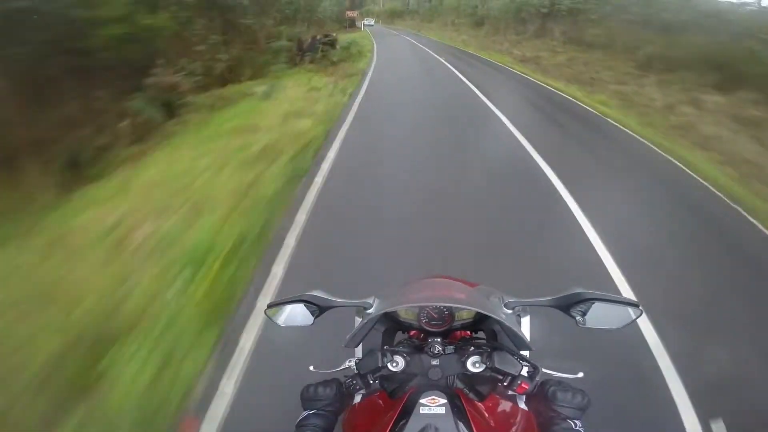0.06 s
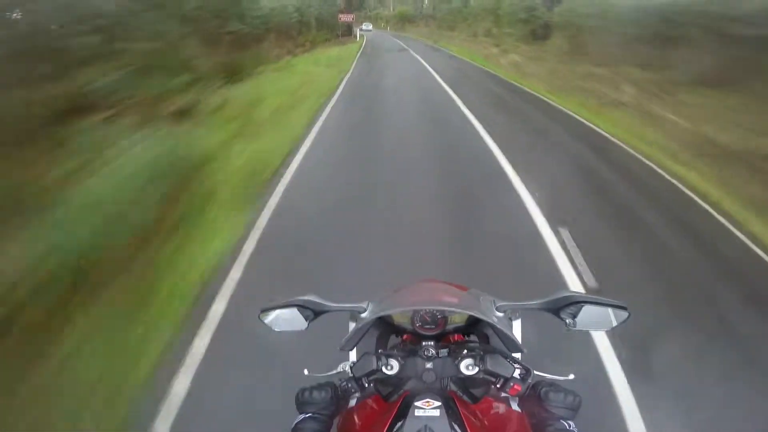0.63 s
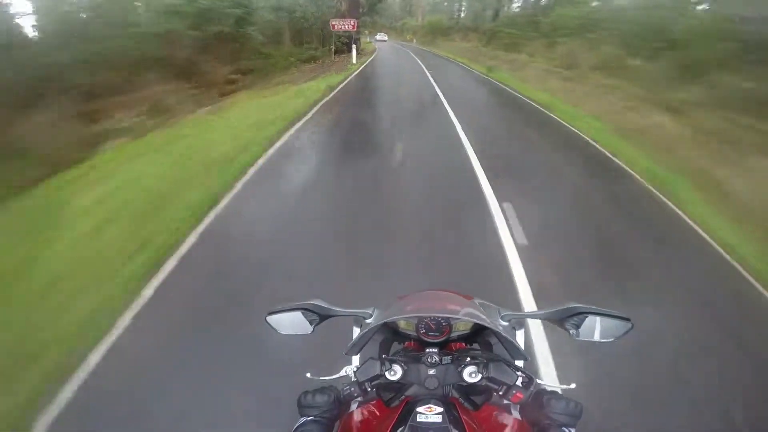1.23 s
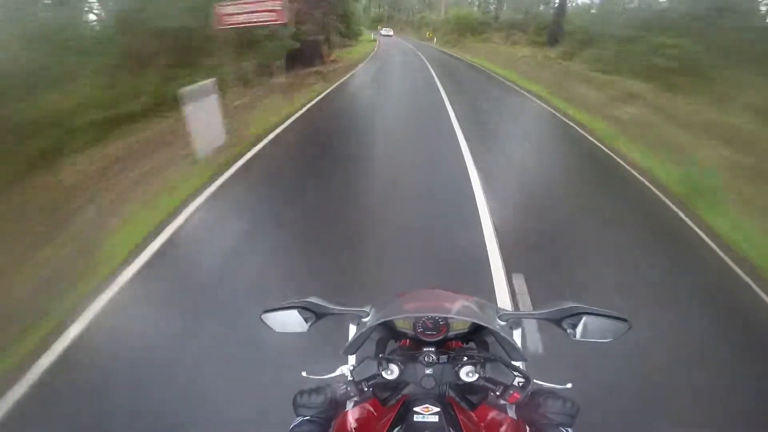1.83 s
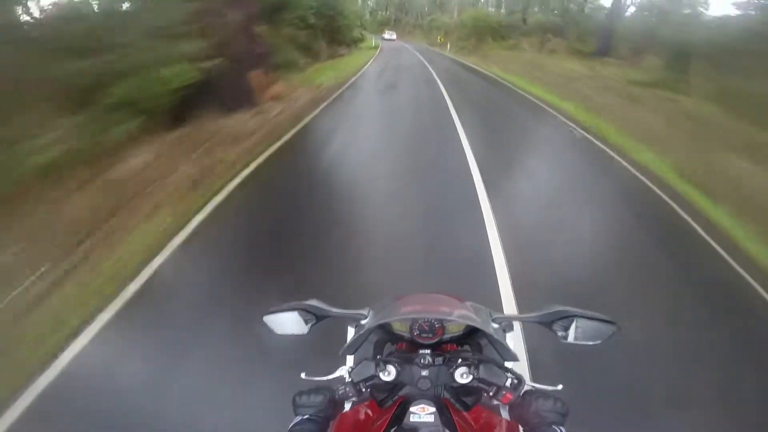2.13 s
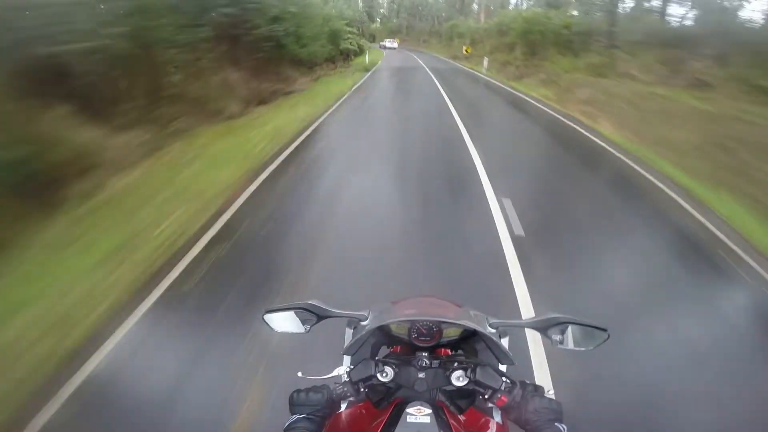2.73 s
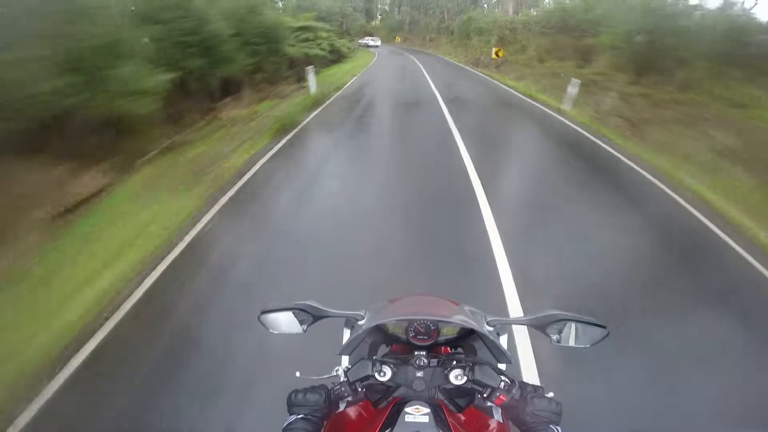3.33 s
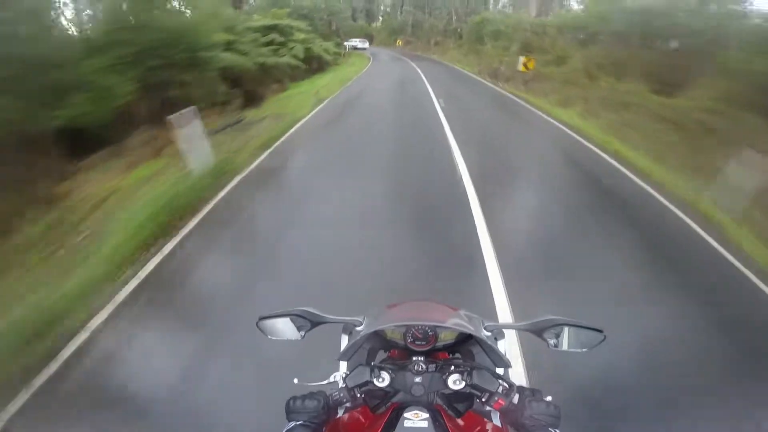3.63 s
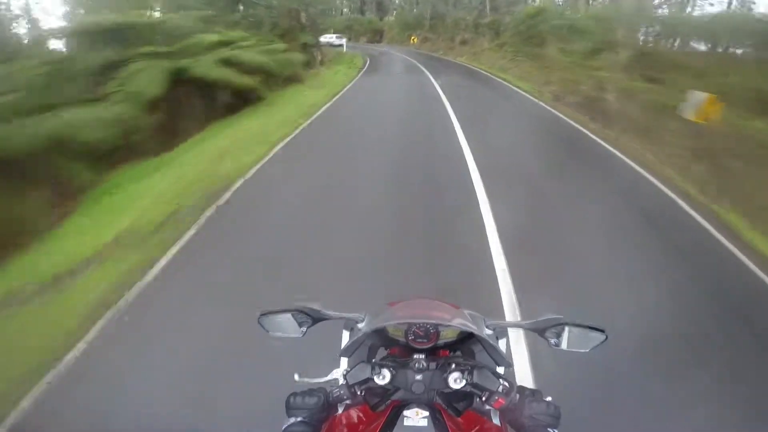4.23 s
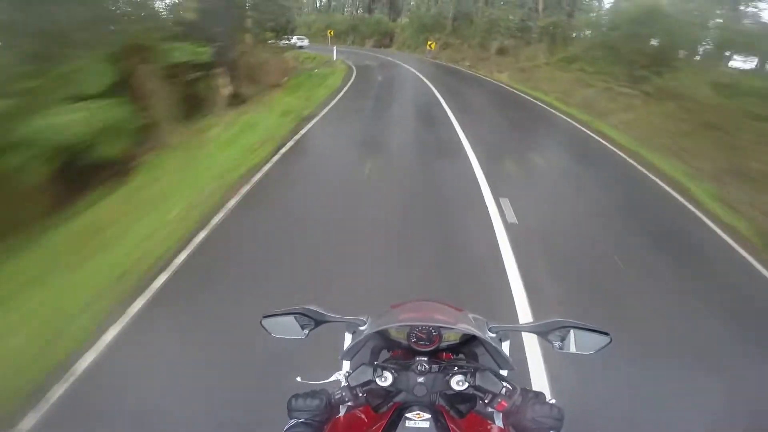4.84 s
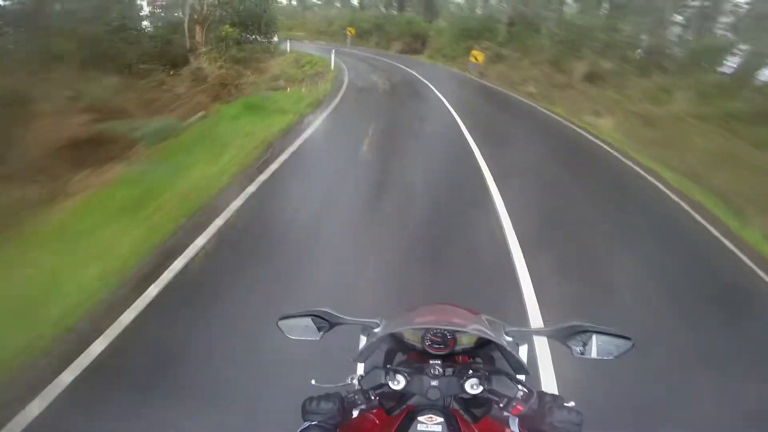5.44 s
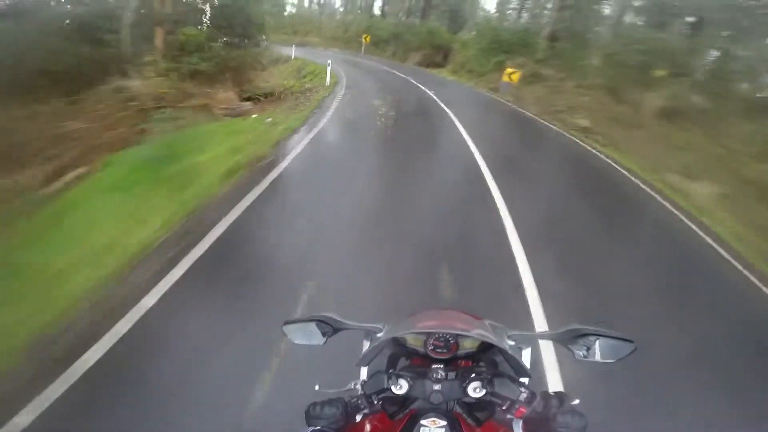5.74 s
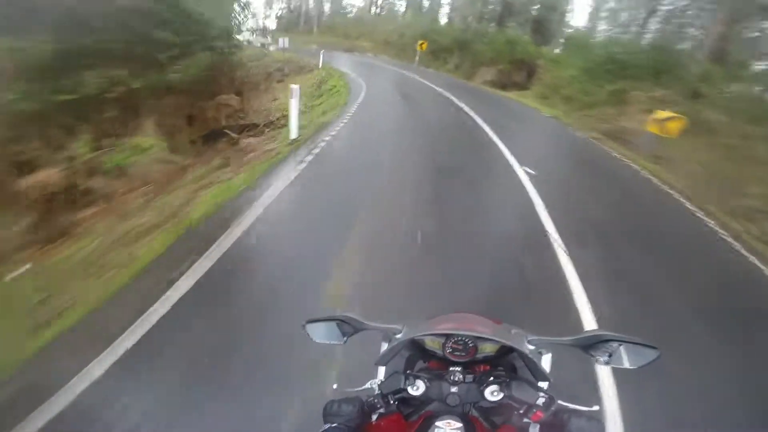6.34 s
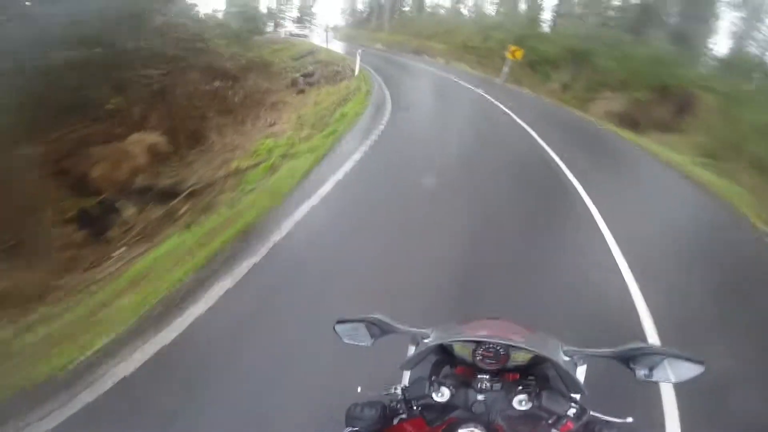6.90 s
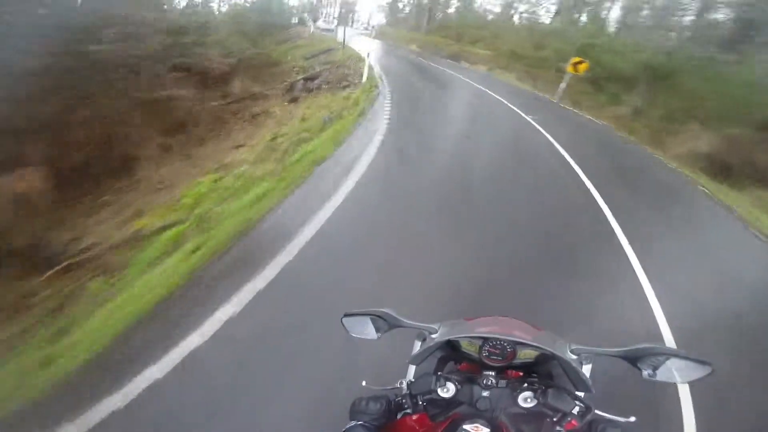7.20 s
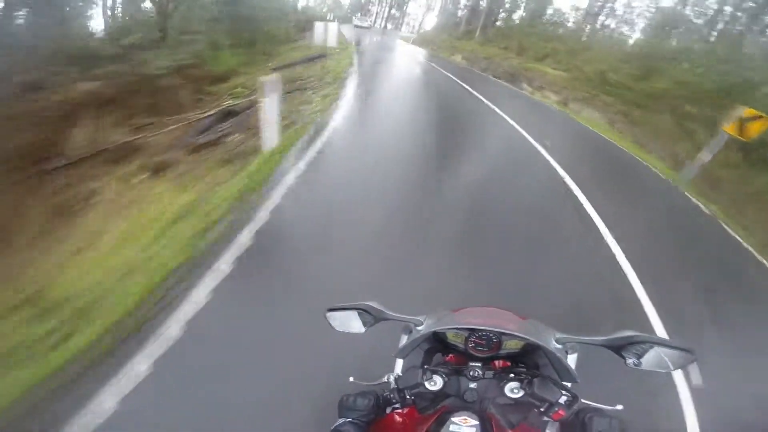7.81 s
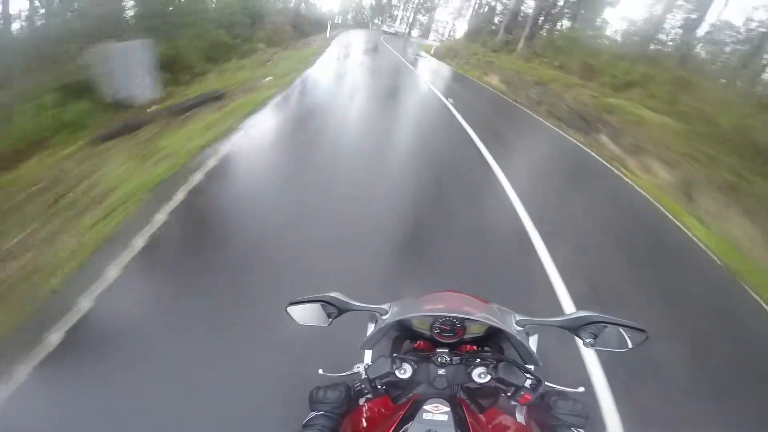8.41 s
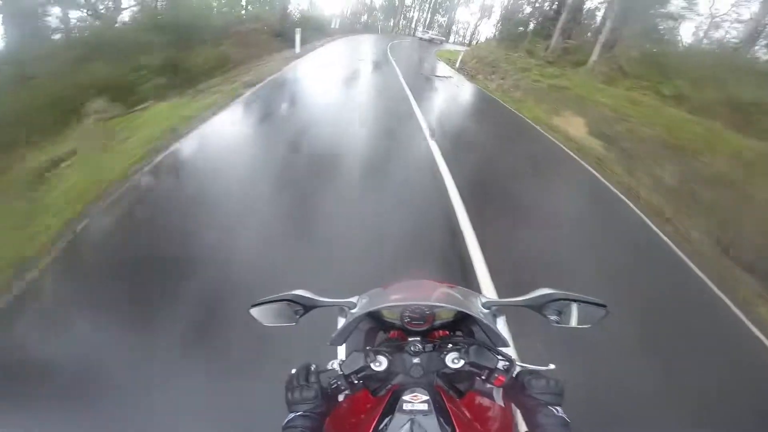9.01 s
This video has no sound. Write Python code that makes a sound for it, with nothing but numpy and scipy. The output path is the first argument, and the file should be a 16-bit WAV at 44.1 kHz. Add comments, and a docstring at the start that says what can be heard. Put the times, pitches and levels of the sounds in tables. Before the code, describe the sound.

Rushing air, surges of spray and a low wind rumble surround a steadily humming motorcycle engine, picked up by an enclosed microphone on the bike. Bumps bring soft booms and raindrops tap right by the microphone. The bike slows for a bend, its note falling and the rush softening. One hard drop clicks loudly, briefly dipping the other sound, then the engine picks up slightly at a low pitch.

```python
"""Motorcycle on a wet road

One microphone, on board, in a closed camera case. The bike cruises, rolls off for a bend and gently
picks up, all in one gear. The engine hums through the mount, which also booms with the bumps. Wind
buffets, the tyres roar, and air and spray hiss through the case, louder with speed and on wet stretches.
Drops tick on the shell, right by the microphone; the hardest makes the limiter duck for a moment."""
import sys
import numpy as np
from scipy import signal
from scipy.fft import rfft, irfft
from scipy.io import wavfile
from scipy.ndimage import minimum_filter1d

SR = 44100
rng = np.random.default_rng(int(sys.argv[2]) if len(sys.argv) > 2 else 0)


def dump(signal):
    """Clip the signal to [-1, 1] and save it as 16-bit WAV at the path in sys.argv[1]."""
    limited = np.clip(np.atleast_2d(signal).T, -1, 1)
    pcm = np.round(limited * 32767).astype(np.int16)
    wavfile.write(sys.argv[1], SR, pcm)


N = 403956
TIME = np.arange(N) / SR
FREQ = np.maximum(np.arange(N // 2 + 1) * SR / N, 1)
CRUISE_HZ, TOP_HZ = 75, 15100  # crank rate at cruise; top of the camera's band

# crank rate, which in one gear also gives road speed: t/s, f/Hz
CRANK_RATE = [(0.0, 73.2), (0.5, 75.76), (1.1, 77.24), (1.6, 77.5), (2.2, 73.57), (3.0, 69.2), (3.6, 63.8),
              (4.2, 58.66), (4.7, 53.3), (5.2, 48.43), (5.8, 43.73), (6.4, 42.76), (7.1, 40.7), (7.8, 41.3),
              (9.16, 43.18)]
# throttle: t/s, opening (0-1)
THROTTLE = [(0, 1), (1.45, 1), (1.8, 0.21), (3.5, 0.26), (6.8, 0.02), (7.3, 0.73), (8.5, 0.7), (9.1, 0.56)]
# low engine orders at cruise, ahead of the frame: crank multiple, level/dB, boost at full throttle/dB
HUM_ORDERS = [(1, -36.5, -1.5), (2, -30, 4), (3, -33, 9), (4, -29, 5.5)]
# path through the frame to the microphone: f/Hz, gain/dB
FRAME_RESPONSE = [(41, 6), (51, -3), (69, 5.5), (78, 0), (88, 2), (106, 2.5), (124, -1.5), (136, -6),
                  (155, -15.5), (175, -19.5), (225, -23), (255, -14), (280, -22.5), (305, -21.5)]
# exhaust pipe: f/Hz, gain/dB
PIPE_RESPONSE = [(200, 4), (250, -17), (300, 3.5), (345, 5.5), (385, -3), (420, -6), (470, -25), (720, -11),
                 (820, -11), (1100, -31)]
# resonances of the valve gear and its covers: f/Hz, width/Hz, gain/dB
VALVE_MODES = [(1496, 380, 8), (2800, 140, 4.5), (3530, 460, -3.5), (4540, 760, -1), (5860, 630, -59)]
# bumps that jolt the mount: t/s, boost of the boom/dB
BUMPS = [(.28, 4), (.45, 4), (.65, 6), (.9, 7), (1.06, 5), (1.15, 10.5), (1.25, 10), (2.0, 6.5), (2.14, 11),
         (2.27, 7), (2.39, 10.5), (2.82, 9.5), (3.0, 9.5), (3.12, 7), (3.61, 5.5), (3.79, 12.5),
         (3.95, 7.5), (4.2, 6), (4.56, 4), (5.0, 8.5), (5.11, 9), (6.27, 9), (6.65, 10.5), (7.2, 8),
         (7.46, 2), (8.28, 7), (8.41, 8), (8.52, 6), (8.64, 10), (8.81, 12)]
# headwind on top of the riding speed: t/s, boost of the air rush/dB
HEADWIND = [(0, -4), (.5, -1.5), (1.1, 2), (1.6, -1.5), (2.4, .5), (5.3, 0.46), (5.5, -1), (6.05, -2),
            (6.45, 2.5), (6.9, -0.1), (8.35, 2), (9.15, -0.5)]
# wind buffeting on the case: f/Hz, relative level/dB
BUFFET_SPECTRUM = [(8, -9), (20, -8.5), (26, -3), (31, -5.5), (38, -6), (60, -14), (110, -8), (200, -26)]
# gusts: start t/s, length/s, boost of the buffeting/dB
GUSTS = [(1.12, 0.27, 3), (1.58, .28, 8), (2.35, 1.6, 3.5), (4.77, 0.072, 6.5), (5.348, 0.072, 6),
         (5.86, .1, 4), (7.1, 0.38, 2.5), (8.771, 0.27, 7)]
# resonances of the case around the microphone: f/Hz, width/Hz, gain/dB
CASE_MODES = [(476.4, 20, -3), (702, 75, -5), (1005, 450, -8.5), (1578, 443, 1.65), (1790, 120, -0.5),
              (1972, 390, 0.4), (2344, 510, -0.84), (2730, 67, 1.5), (2860, 250, -2.5), (3106, 310, -1.9),
              (3510, 110, -4.5), (3696.0, 332, -5.5), (4444, 1370, -20), (5685, 440, -13),
              (6120, 320, -11.5), (6470, 420, -14.5), (7170, 1570, -26), (8950, 2800, -30.5),
              (10520, 1950, -31.5), (12464.0, 1700, -38)]
# wetter road: start t/s, length/s, boost of coarse spray/dB, of fine spray/dB, of mist/dB
WET_STRETCHES = [(.31, 0.034, 4.5, 6.6, 1), (.45, 0.095, 3.5, 7.6, 1), (.63, .03, 1.5, 5.4, 4),
                 (.8, 0.55, 2.5, 5.7, 3.5), (1.486, 0.037, 3, 3, 2.2), (1.697, 0.11, 3, 3.3, 2.2),
                 (2.23, 0.45, 2.5, 3.2, 2.5), (2.844, 0.78, 3, 2.4, 2.7), (3.81, .04, 6.5, 5.6, 3),
                 (3.992, 0.054, 5.5, 4.2, 3.4), (4.44, 0.085, 4.5, 3, 2.2), (4.788, .52, 5, 3.3, 3.4),
                 (5.773, 0.046, 8, 6, 3), (6.26, 0.15, 7, 5, 2.7), (6.498, 0.11, 5, 2.7, 2.7),
                 (7.995, .55, 4.5, 3, 6), (8.7, 0.44, 2.5, 1.9, 3.1)]
# road roar from the tyres below: f/Hz, relative level/dB
ROAD_SPECTRUM = [(40, -24), (90, -8), (165, 6.5), (200, 3), (260, 0), (400, -3), (600, -4.5), (820, -11),
                 (1300, -10.5), (3000, -44)]
# tones of the electronics: f/Hz, level/dB
WHINE_TONES = [(11719, -94), (14625, -80)]
# drops on the case: t/s, peak level/dB, brightness/(dB per octave), ring time factor, struck spot f/Hz
DROPS = [(0.324, -14, -1, .6, 7150), (0.571, -12, 2, 0.44, 9900), (1.968, -30, 12, .5, 13000),
         (1.999, -27, 7, 0.59, 13000), (2.38, -29, 7, .5, 12500), (2.576, -12, -1, 0.63, 6960),
         (4.036, -29, 6, 0.47, 12000), (5.521, 2, 3.5, 1.12, 4680), (5.5995, -13, -3.5, 1.4, 3950),
         (6.0064, -14.5, -4, 0.89, 5800), (8.4655, -15, -1, 0.77, 6000)]
# shell modes, before each drop's brightness and ring time factor: f/Hz, level/dB, t60/s
SHELL_MODES = [(1890, -12, 0.017), (2090, -4, 0.015), (2420, -9, 0.023), (2810, -7, 0.025),
               (3200, -15, 0.024), (3440, -6, 0.0095), (4020, -1.5, 0.0041), (5440, -11, 0.012),
               (5870, -11, 0.011), (7360, -16, 0.0053), (8100, -9, 0.0025), (9000, -24, 0.0044),
               (12600, -21, 0.0047), (13400, -32, .005)]


def undb(db):
    """Decibels to gain."""
    return 10 ** (np.asarray(db) / 20)


def curves(table):
    """The columns of a timed table, one value a sample."""
    times, *columns = np.transpose(table)
    return [np.interp(TIME, times, column) for column in columns]


def unit_rms(x):
    """Scale to rms 1."""
    return x / np.sqrt(np.mean(x ** 2))


def noise():
    """White noise."""
    return rng.standard_normal(N)


def shaped(x, gain):
    """Filter by a gain per frequency; rms 1."""
    return unit_rms(irfft(rfft(x) * gain, N))


def colour(points):
    """Gain per frequency from (f/Hz, level/dB) points, rolling off above the last."""
    hz, db = np.transpose(points)
    return undb(np.interp(np.log(FREQ), np.log(hz), db)) / (1 + (FREQ / hz[-1] / 2) ** 2)


def resonances(modes):
    """Gain per frequency of steep-sided resonances that add in power."""
    gains = (undb(db) / (1 + ((FREQ ** 2 - hz ** 2) / (FREQ * width)) ** 2) for hz, width, db in modes)
    return np.sqrt(sum(gain ** 2 for gain in gains))


def above(hz):
    """Share of power above a steep crossover."""
    return 1 / (1 + (hz / FREQ) ** 16)


def drift(rate_hz):
    """Smooth random wavering, up to about rate_hz; rms 1."""
    return shaped(noise(), np.exp(-(FREQ / rate_hz) ** 2))


def steadied(x, evenness):
    """Make the random beating of a noise shallower; rms 1."""
    return unit_rms(x / np.abs(signal.hilbert(x)) ** evenness)


def with_speed(db_per_decade):
    """Level change in dB as the bike runs slower or faster than its cruise."""
    crank_hz, = curves(CRANK_RATE)
    return db_per_decade * np.log10(crank_hz / CRUISE_HZ)


def swell(start, length, rise_s, fall_s):
    """Rises to 1 by the start, holds for the length and falls away."""
    return np.interp(TIME, [start - rise_s, start, start + length, start + length + fall_s], [0, 1, 1, 0])


def engine(wander=0.0019, rough_db=2, drone_db=-65, drone_load_db=23, even_db=-6,
           clatter_db=-48, clatter_load_db=2):
    """Close by, low crank orders hum through the frame; upper ones drone in the pipe under throttle."""
    crank_hz, = curves(CRANK_RATE)
    throttle, = curves(THROTTLE)
    angle = 2 * np.pi * np.cumsum(crank_hz * (1 + wander * drift(5.4))) / SR

    def order(k, response):
        gain = undb(np.interp(k * crank_hz, *np.transpose(response)))
        return gain * np.sqrt(2) * np.sin(k * angle + rng.uniform(0, 2 * np.pi))

    hum = sum(undb(db + load_db * throttle + rough_db * drift(26)) * order(round(k), FRAME_RESPONSE)
              for k, db, load_db in HUM_ORDERS)
    # uneven firing intervals favour the odd orders
    drone = sum(undb(even_db * (k % 2 == 0) + drift(15)) * order(k, PIPE_RESPONSE) for k in range(5, 13))
    drone *= undb(drone_db + drone_load_db * throttle)
    # the valve gear rustles twice a turn
    clatter = shaped(noise() * (1 + 0.2 * np.cos(2 * angle)), resonances(VALVE_MODES))
    clatter *= undb(clatter_db + clatter_load_db * throttle)
    return (hum + drone) * undb(with_speed(db_per_decade=37)) + clatter


def mount_boom(hz=136.7, width_hz=15, boom_db=-29, headwind_share=0.68):
    """Road and headwind keep the mount under the microphone swinging; each bump makes the boom swell."""
    jolt_db = sum(db * swell(start, 0, rise_s=0.052, fall_s=0.084) for start, db in BUMPS)
    headwind_db, = curves(HEADWIND)
    swing = shaped(noise(), resonances([(hz, width_hz, 0)]))
    level_db = boom_db + with_speed(db_per_decade=43) + headwind_share * headwind_db + jolt_db
    return steadied(swing, evenness=0.36) * undb(level_db)


def wind_buffet(buffet_db=-33.5):
    """Low turbulence pushes right on the case, harder with speed and in gusts."""
    gust_db = sum(db * swell(start, length, rise_s=0.15, fall_s=0.1) for start, length, db in GUSTS)
    turbulence = steadied(shaped(noise(), colour(BUFFET_SPECTRUM)), evenness=0.37)
    return turbulence * undb(buffet_db + with_speed(db_per_decade=33) + gust_db)


def air_and_spray(air_db=-25, coarse_db=-29.5, fine_db=-40.5, mist_db=-46,
                  coarse_hz=2650, fine_hz=4800, mist_hz=6900,
                  grain_db=2.5, flutter_db=0.5, spray_flutter_db=0.58):
    """Air and countless droplets excite the case, heard from inside; wetter road throws up more spray."""
    headwind_db, = curves(HEADWIND)
    case = resonances(CASE_MODES)
    air = shaped(noise(), case * np.sqrt(1 - above(coarse_hz)))
    air *= undb(air_db + with_speed(db_per_decade=62) + headwind_db)
    droplets = noise() * undb(grain_db * np.minimum(rng.exponential(size=N), 6))
    wet_db = sum(np.outer(boosts, swell(start, length, rise_s=0.023, fall_s=0.13))
                 for start, length, *boosts in WET_STRETCHES)
    sizes = [(coarse_db, above(coarse_hz) * (1 - above(fine_hz))),
             (fine_db, above(fine_hz) * (1 - above(mist_hz))),
             (mist_db, above(mist_hz))]
    spray = sum(shaped(droplets, case * np.sqrt(band)) * undb(db + boost_db)
                for (db, band), boost_db in zip(sizes, wet_db))
    spray *= undb(with_speed(db_per_decade=67) + spray_flutter_db * drift(25))
    return (air + spray) * undb(flutter_db * drift(29))


def tyre_roar(roar_db=-34, uneven_db=1.1):
    """Below the microphone the road roars under the tyres, louder with speed."""
    roar = shaped(noise(), colour(ROAD_SPECTRUM))
    return roar * undb(roar_db + with_speed(db_per_decade=47) + uneven_db * drift(6.1))


def electronic_whine():
    """The electronics add faint, steady high tones."""
    return sum(undb(db) * np.sqrt(2) * np.sin(2 * np.pi * hz * TIME) for hz, db in WHINE_TONES)


def drop_ticks(splash_db=-22, splash_s=0.00081, spot_db=-1, spot_t60=0.0068, contact_s=0.00005):
    """Right by the microphone each drop rings the shell and the spot it hits; small ones are brighter."""
    ticks = np.zeros(N)
    t = TIME[:SR // 10]
    # the stiff shell radiates little bass
    low_cut = signal.butter(4, 1250, "high", fs=SR, output="sos")
    for start_s, peak_db, brightness, ring_factor, spot_hz in DROPS:
        ring = 0
        for hz, mode_db, t60 in SHELL_MODES + [(spot_hz, spot_db, spot_t60)]:
            fade = np.exp(-np.log(1000) * t / (t60 * ring_factor))
            ring += undb(mode_db + brightness * np.log2(hz / 5000)) * fade * np.sin(2 * np.pi * hz * t)
        splash = undb(splash_db + brightness) * rng.standard_normal(len(t)) * np.exp(-t / splash_s)
        # a softer contact builds up more slowly
        onset = 1 - np.exp(-t / (contact_s * undb(-3 * brightness)))
        tick = signal.sosfilt(low_cut, (ring / np.abs(ring).max() + splash) * onset)
        start = int(start_s * SR)
        ticks[start:start + len(t)] -= undb(peak_db) * tick / np.abs(tick).max()
    return ticks


def limiter(x, threshold_db=-5, hold_s=0.1, release_db_per_s=14, attack_s=0.0084):
    """A peak over the threshold turns the gain down; it holds, then creeps back."""
    level_db = 20 * np.log10(np.abs(x).max(axis=0) + 1e-9)
    over_db = np.maximum(level_db - threshold_db, 0)
    fading_db = np.maximum.accumulate(over_db + release_db_per_s * TIME) - release_db_per_s * TIME
    hold = int(hold_s * SR)
    duck_db = -minimum_filter1d(-fading_db, hold + 1, origin=hold // 2)
    pole = np.exp(-1 / (attack_s * SR))
    # smoothed twice, the gain is too slow to catch the peak itself
    for _ in range(2):
        duck_db = signal.lfilter([1 - pole], [1, -pole], duck_db)
    return x * undb(-duck_db)


def scene():
    """Everything reaches the one microphone in the case, the same left and right."""
    mono = engine() + mount_boom() + wind_buffet() + air_and_spray() + tyre_roar()
    mono += electronic_whine() + drop_ticks()
    return np.array([mono, mono])


def record(dry):
    """The camera clips at full scale, ducks after a peak and cuts the top."""
    high_cut = signal.ellip(8, 0.2, 70, TOP_HZ, fs=SR, output="sos")
    return signal.sosfilt(high_cut, limiter(np.clip(dry, -1, 1)))


dry = scene()
out = record(dry)
dump(out)
```